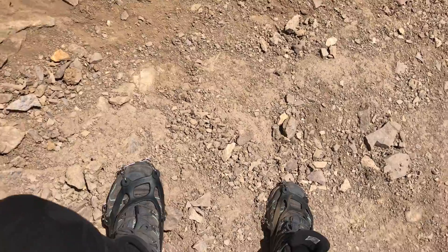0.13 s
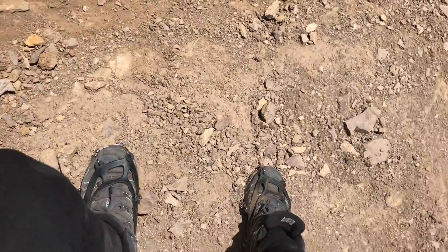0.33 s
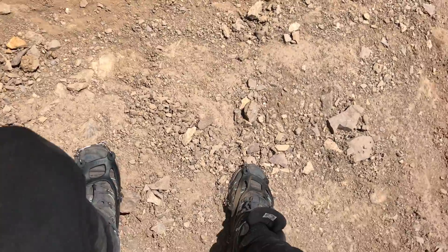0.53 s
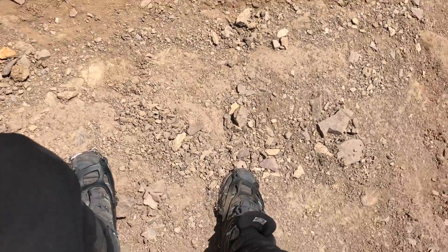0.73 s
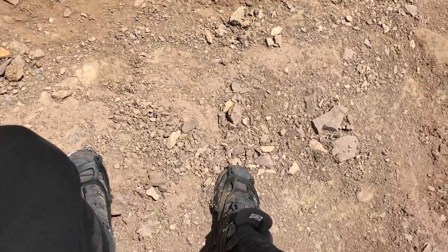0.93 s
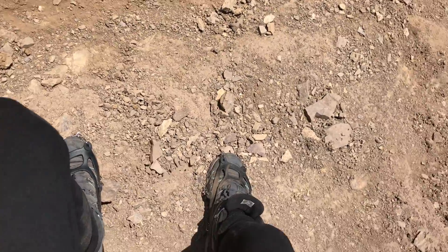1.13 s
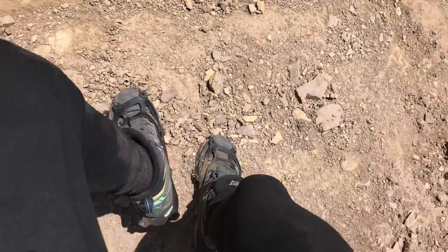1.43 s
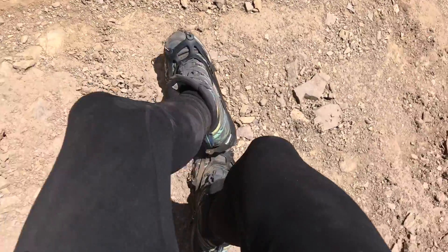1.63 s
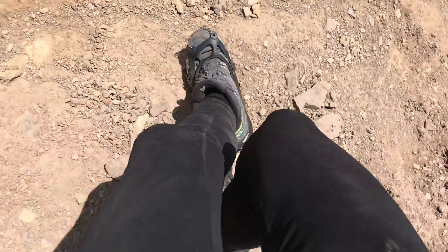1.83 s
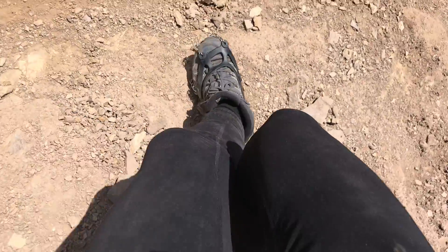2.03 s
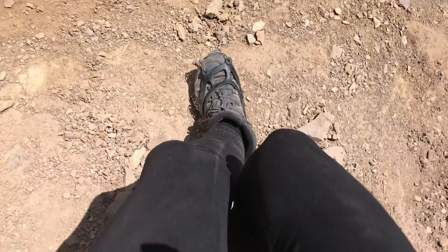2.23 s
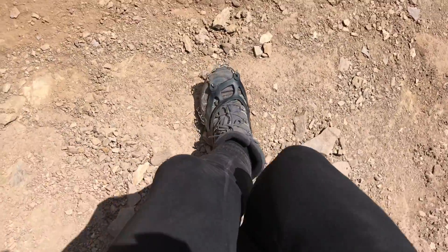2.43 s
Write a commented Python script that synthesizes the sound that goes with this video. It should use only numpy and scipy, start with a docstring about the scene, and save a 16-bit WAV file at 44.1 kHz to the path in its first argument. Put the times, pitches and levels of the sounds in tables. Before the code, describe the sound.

Wind rumbles and buffets a hand-held microphone while shoes faintly scuff and click on stony dirt

```python
"""Open slope of dry dirt and loose stones: a hiker shifts weight and takes a step.
Soles grind grit (coloured random clicks plus dust noise); stones snap against each other
(an impulse and a decaying noise rattle, band-filtered). Gusts buffet the hand-held microphone
(low filtered noise with flutter, plus single slowing pressure swings) over faint air and hiss."""
import sys
import numpy as np
from scipy import signal
from scipy.fft import rfft, irfft
from scipy.io import wavfile
from scipy.ndimage import uniform_filter1d

SR = 44100
rng = np.random.default_rng(int(sys.argv[2]) if len(sys.argv) > 2 else 0)


def materialize(psi):
    """Save the field psi as 16-bit PCM at rate SR to the path in sys.argv[1].

    A 1-D psi becomes a single channel; in a 2-D psi each row is a channel.
    """
    bounded = np.clip(np.atleast_2d(psi).T, -1, 1)
    quanta = np.round(bounded * 32767).astype(np.int16)
    wavfile.write(sys.argv[1], SR, quanta)


N = 113337


def undb(db):
    """Decibels to gain."""
    return 10 ** (np.asarray(db) / 20)


def unit(x):
    """Scale to rms 1."""
    return x / np.sqrt(np.mean(x ** 2))


def bins():
    """Frequency [Hz] of every bin of a full-length spectrum, at least 1 Hz."""
    return np.maximum(np.arange(N // 2 + 1) * SR / N, 1)


def colour(x, points, gain=1):
    """Filter by (frequency [Hz], gain [dB]) points and an extra gain per bin; rms 1."""
    hz, db = np.array(points).T
    curve_db = np.interp(np.log(bins()), np.log(hz), db)
    return unit(irfft(rfft(x) * undb(curve_db) * gain, N))


def walk(rate_hz):
    """Smooth random wander with a spread of 1: noise averaged twice."""
    width = max(int(SR / rate_hz), 2)
    once = uniform_filter1d(rng.standard_normal(N), width)
    return unit(uniform_filter1d(once, width))


def swell(t, start_s, attack_s, hold_s, release_s):
    """Envelope with sine-squared attack and release around a hold."""
    rise = (t - start_s) / attack_s
    fall = 1 + (start_s + attack_s + hold_s - t) / release_s
    ramp = np.clip(np.minimum(rise, fall), 0, 1)
    return np.sin(ramp * np.pi / 2) ** 2


def air():
    """Distant air and microphone hiss: steady coloured noise."""
    level_db = -71
    # spectrum: (frequency [Hz], gain [dB])
    air_curve = [(100, 8), (700, 2.5), (1500, -1), (3000, -7.5), (6000, -11.5), (9000, -14), (10500, -14.5),
                 (15000, -13.5)]
    return undb(level_db) * colour(rng.standard_normal(N), air_curve)


def turbulence(corner_hz):
    """Fluttering air pressure, rms 1: rolls off above the corner, more steeply above 2.61 corners."""
    flutter_db, flutter_hz, corner_slope = 3, 74.4, 3.08
    # wind pressure ahead of the corner roll-off: (frequency [Hz], gain [dB])
    wind_curve = [(15, -41), (30, -25.5), (46, -2.5), (68, 3), (85, -2.5), (120, -2.5), (230, -6),
                  (450, -11), (680, -15), (1000, -29), (2500, -52)]
    flow = rng.standard_normal(N) * undb(flutter_db * walk(flutter_hz))
    ratio = bins() / corner_hz
    rolloff = 1 / np.sqrt((1 + ratio ** corner_slope) * (1 + (ratio / 2.61) ** 5))
    return colour(flow, wind_curve, rolloff)


def wind(t):
    """Light breeze with short gusts on the microphone; faster air has a higher corner."""
    breeze_db, breeze_corner_hz = -42.5, 99.3
    edge_s = 0.0067
    # gusts: (mid-attack [s], attack plus hold [s], rms level [dB], corner [Hz])
    gust_table = [(0.074, 0.038, -27.5, 165), (0.169, .035, -36, 166), (0.242, 0.036, -30.5, 133),
                  (.295, 0.039, -30.5, 124), (0.335, 0.13, -32.5, 220), (0.465, 0.077, -35, 110.6),
                  (0.554, 0.057, -46.5, 171), (0.631, .15, -31, 254), (0.788, 0.062, -36, 94.5),
                  (1.009, 0.029, -38, 140), (1.062, 0.064, -38, 151), (1.116, 0.089, -38, 83),
                  (1.222, 0.13, -35.5, 151), (1.331, 0.0834, -41, 113), (1.422, .11, -39.5, 190),
                  (1.531, 0.071, -43, 135), (1.629, 0.034, -34, 158), (1.678, .06, -40, 94.5),
                  (1.731, 0.035, -34.5, 184), (1.792, 0.11, -38.5, 217), (1.898, 0.068, -38.5, 140),
                  (1.982, 0.026, -35.5, 205), (2.035, 0.059, -36.5, 194), (2.241, 0.057, -32, 236),
                  (2.359, 0.027, -35.5, 203), (2.403, .085, -32.5, 246), (2.506, 0.13, -34, 290)]
    out = undb(breeze_db) * turbulence(breeze_corner_hz)
    for start_s, length_s, db, corner_hz in gust_table:
        env = swell(t, start_s - edge_s / 2, edge_s, length_s - edge_s, 2 * edge_s)
        gust = env * turbulence(corner_hz)
        energy_match = np.sqrt(np.sum(env ** 2) / np.sum(gust ** 2))
        out = out + undb(db) * gust * energy_match
    return out


def eddies(t):
    """Single eddies thump the microphone: brief pressure swings that slow as they pass."""
    rise_cycles, fall_cycles = 0.29, 0.88  # Gaussian spreads
    slowing = 0.55  # frequency drop per cycle, exponential
    # eddies: (peak time [s], peak level [dB], frequency at the peak [Hz])
    eddy_table = [(.251, -33, 188), (.345, -30.5, 311), (.418, -32, 336), (0.433, -33, 360),
                  (0.449, -22.5, 176.5), (.543, -27, 214), (.665, -39, 360), (0.717, -27.5, 324),
                  (0.767, -31.5, 380), (0.972, -44, 283), (1.02, -26, 99), (1.114, -30.5, 188),
                  (1.22, -19, 313), (1.266, -35.5, 354), (1.323, -29, 252), (1.430, -34, 426),
                  (1.646, -31.5, 154), (1.747, -29.5, 180), (1.810, -32, 354), (1.855, -41.5, 330),
                  (1.882, -25.5, 115), (1.996, -27, 213), (2.042, -28, 184), (2.26, -30.5, 258),
                  (2.284, -23, 157), (2.414, -20, 127), (2.53, -35, 440), (2.556, -25, 318),
                  (2.568, -20.5, 513)]
    out = np.zeros(N)
    for at_s, db, hz in eddy_table:
        cycles = np.clip((t - at_s) * hz, -4, 8)
        spread = np.where(cycles < 0, rise_cycles, fall_cycles)
        env = np.exp(-(cycles / spread) ** 2 / 2)
        phase = 2 * np.pi * (1 - np.exp(-slowing * cycles)) / slowing
        out += undb(db) * env * np.cos(phase)
    return out


def grains(rate_per_s, spread_db):
    """Random clicks of either sign, mostly small with a few large ones."""
    spreads = rng.exponential(size=N) % 3.6  # wraps below 3.6 spreads
    size = undb(spread_db * spreads)
    hit = rng.random(N) < rate_per_s / SR
    return hit * size * np.sign(rng.standard_normal(N))


def gravel(t):
    """Soles crush dense grains in uneven slips over dust hiss; stray grains tick in between."""
    grains_per_s, grain_spread_db, dust_share = 1700, 4.5, 0.4
    stray_per_s, stray_spread_db = 260, 4
    slip_db, slip_hz = 3, 110  # the sole catches and slips
    # colour of the grit: (frequency [Hz], gain [dB])
    grit_curve = [(200, -23.5), (600, 5.5), (1100, 4), (1900, -2.5), (2700, 2), (4000, 0), (6500, -6),
                  (9000, -4.5), (10500, -12), (13000, -9), (15500, -17)]
    # stray grains shifting under the standing foot: (time [s], level [dB])
    stray_levels = [(0, -104), (.5, -95), (.8, -78), (1.3, -71.5), (1.6, -77.5), (2.15, -74.5), (2.57, -79)]
    # scuffs: (start [s], attack [s], hold [s], release [s], level [dB], tilt [dB/octave])
    scuff_table = [(0.555, 0.069, 0.14, 0.13, -70, -3.5), (0.659, 0.016, 0.054, 0.099, -62.5, -2.3),
                   (0.937, 0.24, .3, .2, -71, 5.5), (1.195, 0.006, 0.075, 0.018, -72, 1),
                   (1.307, 0.0067, 0.033, 0.14, -69, 0), (1.467, .002, 0.012, .008, -57.5, -1),
                   (1.48, 0.0095, 0.01, 0.026, -65.5, -1.5), (1.594, .05, 0.032, 0.16, -66, -1),
                   (1.744, 0.019, 0.12, .04, -71.5, 0.5), (1.898, 0.0036, 0.029, 0.062, -54.5, -3),
                   (1.959, 0.015, 0.08, 0.11, -57.5, -4.5), (2.29, 0.026, 0.011, .04, -68, -6)]
    stray_db = np.interp(t, *np.array(stray_levels).T)
    out = undb(stray_db) * colour(grains(stray_per_s, stray_spread_db), grit_curve)
    slips = undb(slip_db * walk(slip_hz))
    tilt_octaves = np.log2(np.maximum(bins(), grit_curve[1][0]))  # flat below the second grit point
    for start_s, attack_s, hold_s, release_s, db, tilt in scuff_table:
        dust = dust_share * rng.standard_normal(N)
        crush = slips * (unit(grains(grains_per_s, grain_spread_db)) + dust)
        env = swell(t, start_s, attack_s, hold_s, release_s)
        out += undb(db) * env * colour(crush, grit_curve, undb(tilt * tilt_octaves))
    return out


def stones(t):
    """Stone contacts: a sharp snap and a dying rattle in the stone's band, with some body below."""
    rattle_db = -13  # micro-contacts that follow the first touch
    tail_db, tail_s = -35.5, 0.0075  # tail level relative to the rattle
    body_db = -11.5
    # contacts: (time [s], peak level [dB], centre [Hz], width [octaves], decay [ms])
    stone_table = [(0.677, -49, 2600, 0.59, 0.58), (.735, -51, 2740, 0.4, 1.4),
                   (1.089, -45, 6040, 0.64, 0.51), (1.2031, -44.5, 1480, 1.8, 1.3),
                   (1.209, -42.5, 5000, 1.5, 1.1), (1.239, -46, 13000, .6, .6),
                   (1.2473, -46, 4900, 0.9, .8), (1.263, -39.5, 5950, 3.7, 1.8),
                   (1.312, -45, 6040, 1.5, .5), (1.317, -47, 7440, .8, 0.27),
                   (1.3216, -21, 3930, 1.9, 0.82), (1.331, -36, 5870, 2.1, 0.39),
                   (1.341, -29.5, 7700, 2.7, 0.12), (1.3476, -51, 13000, .5, .5),
                   (1.474, -46, 1083, 0.94, 3), (1.71, -46.5, 1440, 0.35, 1.8),
                   (1.885, -47.5, 11000, 1.4, 1.1), (1.904, -56, 13100, .7, 1),
                   (1.924, -50, 3000, 0.79, 0.87), (1.932, -44, 3800, 1.1, 1.2), (1.956, -58, 3200, 1, .8),
                   (1.989, -41.5, 970, 0.46, 3.9), (2.089, -42.5, 1050, 0.52, 2.1),
                   (2.112, -46, 1340, 0.37, 0.91), (2.27, -44.5, 7700, 1, 0.45), (2.337, -50, 4500, 1, .6),
                   (2.343, -55, 4200, 0.54, 0.49), (2.366, -40.5, 974, 0.44, 2),
                   (2.3655, -47.5, 2460, .5, 1.4), (2.5508, -45, 6500, 1.2, 0.27),
                   (2.551, -55.5, 11150, 0.052, 1.6)]
    out = np.zeros(N)
    for at_s, db, hz, octaves, decay_ms in stone_table:
        age_s = np.maximum(t - at_s, 0)
        decay = np.exp(-age_s * 1000 / decay_ms)
        tail = undb(tail_db) * np.exp(-age_s / tail_s)
        env = (t >= at_s) * (decay + tail)
        force = undb(rattle_db) * env * rng.standard_normal(N)
        force[np.searchsorted(t, at_s)] += 1  # first touch
        away = np.log2(bins() / hz) / octaves
        body = undb(body_db) * (away < 0) / (1 + (away / 3) ** 4)
        band = 1 / (1 + away ** 2) ** 2 + body
        crack = irfft(rfft(force) * band, N)
        out += undb(db) * crack / np.abs(crack).max()
    return out


def scene():
    """Faint air, wind on the microphone and the ground underfoot, summed to one channel."""
    t = np.arange(N) / SR
    return (air() + wind(t) + eddies(t) + gravel(t) + stones(t))[None]


def record(dry):
    """Silence until a brief moment in, then the sound cuts in abruptly; the deepest bass and the top of the
    treble are cut."""
    start_s, low_cut_hz, top_hz = .0835, 37.3, 16000
    live = np.arange(N) / SR >= start_s
    low_cut = signal.butter(2, low_cut_hz, "high", fs=SR, output="sos")
    high_cut = signal.ellip(8, .2, 70, top_hz, fs=SR, output="sos")
    return signal.sosfilt(high_cut, signal.sosfilt(low_cut, dry * live))


dry = scene()
out = record(dry)
materialize(out)
```